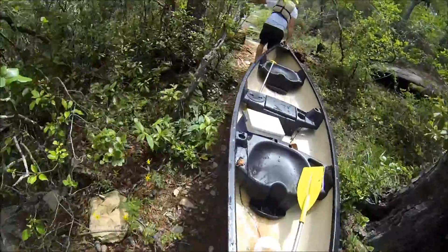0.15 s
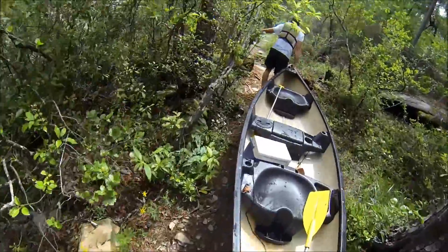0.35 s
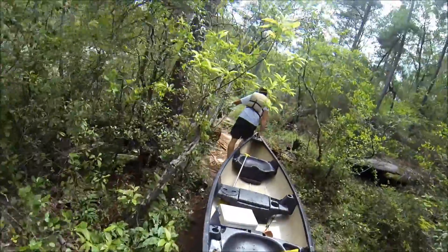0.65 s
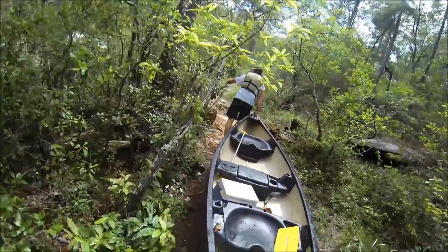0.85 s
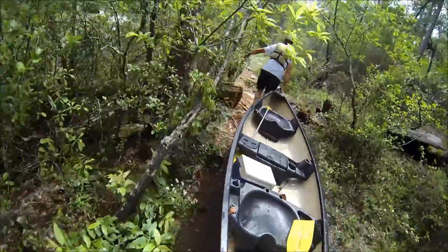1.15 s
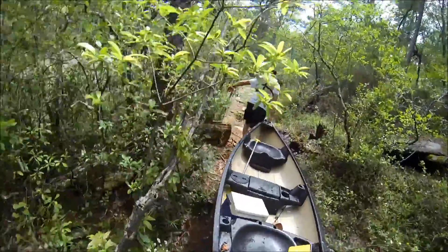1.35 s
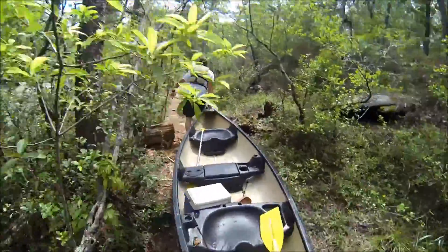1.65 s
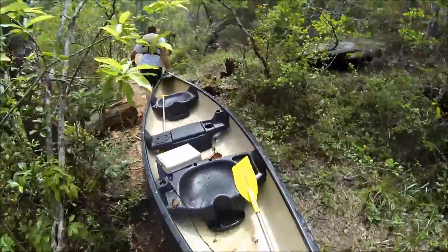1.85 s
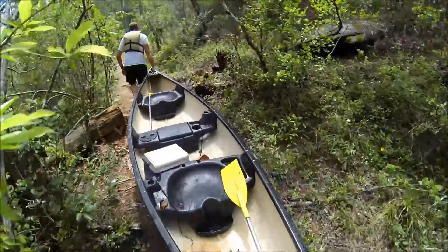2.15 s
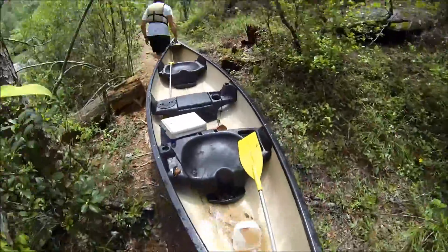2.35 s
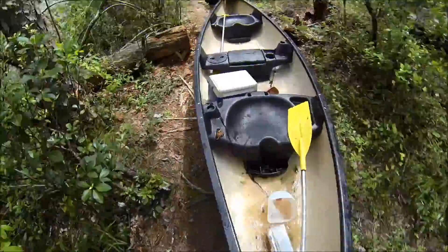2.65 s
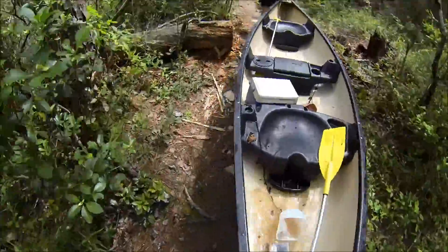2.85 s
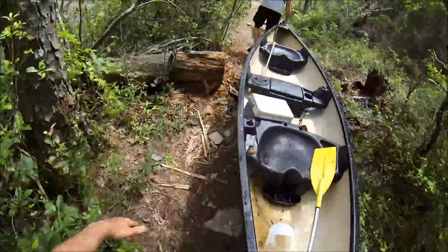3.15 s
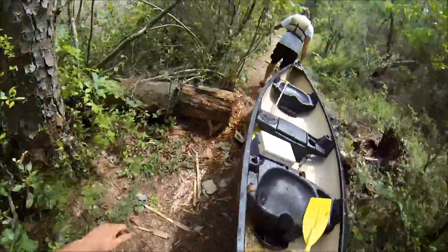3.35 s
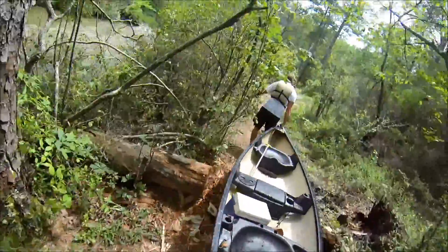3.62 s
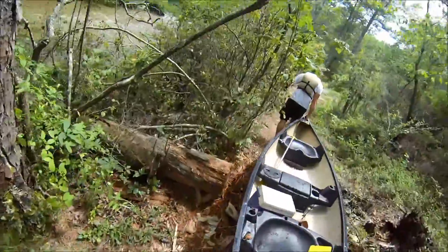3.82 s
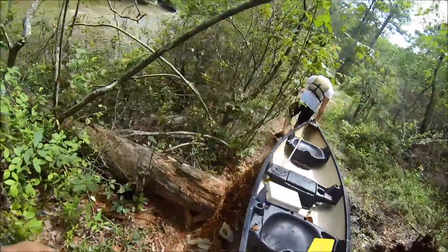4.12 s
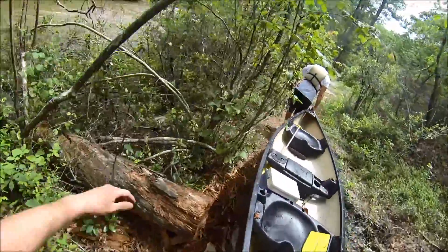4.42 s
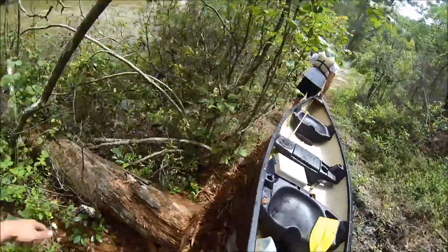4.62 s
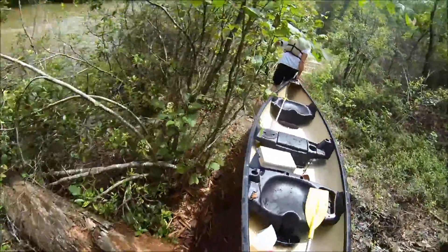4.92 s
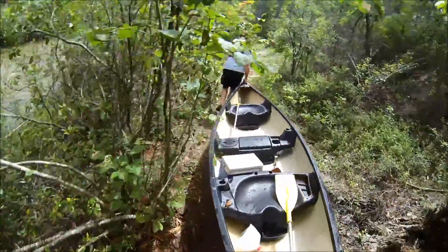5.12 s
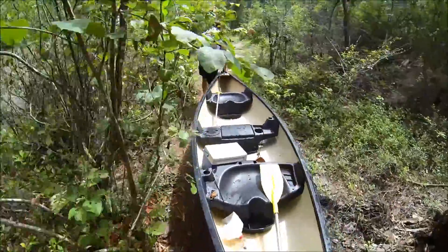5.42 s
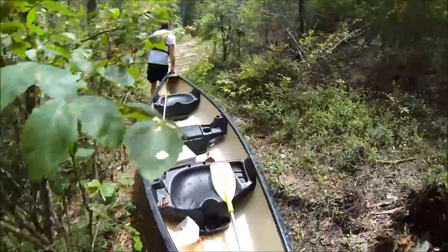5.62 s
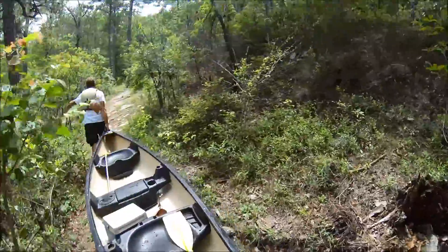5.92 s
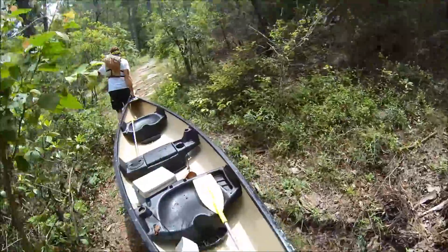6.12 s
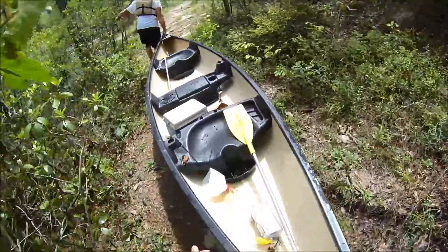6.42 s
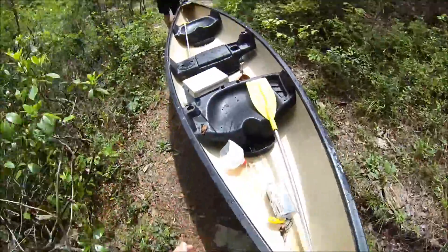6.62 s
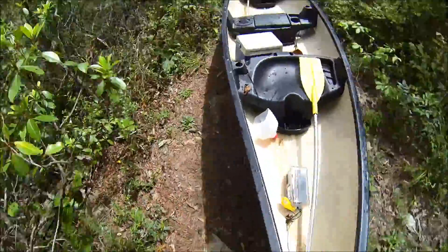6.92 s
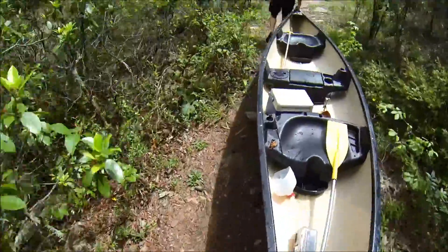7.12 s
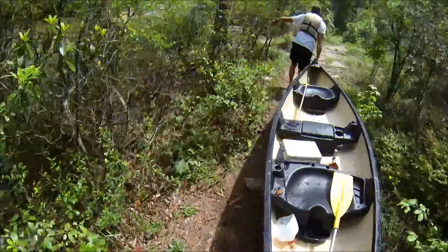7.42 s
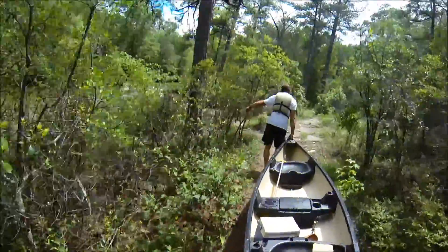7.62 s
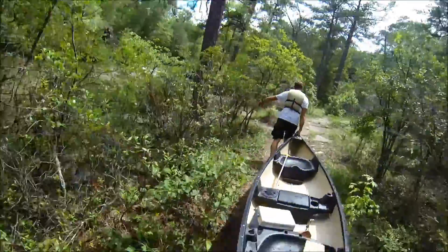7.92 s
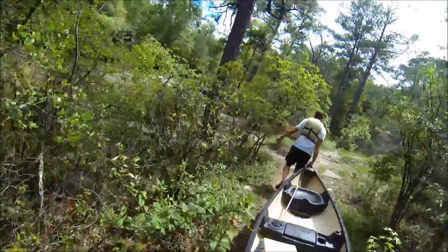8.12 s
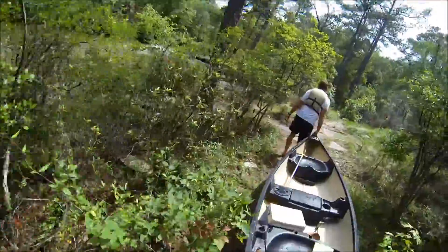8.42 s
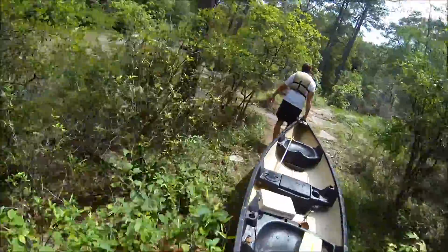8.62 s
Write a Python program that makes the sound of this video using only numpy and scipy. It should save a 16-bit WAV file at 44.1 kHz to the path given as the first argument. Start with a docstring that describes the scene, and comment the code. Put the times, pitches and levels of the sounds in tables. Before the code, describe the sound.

Outdoors on a wooded trail, a plastic canoe is dragged over dirt, heard close through a muffling case. Deep, almost subsonic jolts from steps and tugs come irregularly throughout, with continuous rocking rumble between them; notable ones fall near 0.45, 1.65, 2.15 and 5.6 seconds, and the heaviest near 6.1 and 8.2. A quiet, low, grainy hull drone continues underneath. Dull stone knocks occur near 0.1, 1.0, 2.3, 6.7 and 8.3, and soft case bumps near 0.8, 3.5, 4.4, 6.2 and 8.35. A sharp cluster of twig ticks snaps at 1.9, with single ticks near 2.8, 6.7, 7.8 and 8.0. Faint leafy crackles brush past around 1.9, 3.45, 5.1, 6.75, 7.5 and 8.1. Steady hollow hiss, slightly softer later, and a very faint high pulsing electronic whine persist to the end.

```python
"""On a woodland trail a plastic canoe is hauled along, heard from a body-worn camera in a closed case.
Steps and tugs shake the case into a deep rumble: brief swings that swell and fade over narrow-band noise.
The hull drones over dirt as filtered random grains, with soft bumps; stones and twigs ring as decaying modes.
Leaves brush past as bursts of crackle; they and the microphone's hiss take on the case's hollow resonances.
The camera's electronics whine faintly about thirty times a second, as a gated tone with some hiss."""
import sys
import numpy as np
from scipy import signal
from scipy.fft import rfft, irfft
from scipy.io import wavfile
from scipy.ndimage import uniform_filter1d

SR = 44100
rng = np.random.default_rng(int(sys.argv[2]) if len(sys.argv) > 2 else 0)


def transcribe(signal):
    """Save signal, clipped to [-1, 1], as a 16-bit WAV file at the path in sys.argv[1]."""
    frames = np.atleast_2d(signal).T
    limited = np.clip(frames, -1, 1)
    pcm = np.round(limited * 32767).astype(np.int16)
    wavfile.write(sys.argv[1], SR, pcm)


N = 386316

# Levels in the tables are relative wherever a source adds its own level.
# Steps and tugs that jolt the case: [t/s, level/dB, half length/s]
JOLTS = [(0.019, -16, 0.015), (0.452, -9.5, 0.018), (0.513, -14, 0.027), (0.681, -21, 0.0094),
         (1.087, -19.5, 0.08), (1.218, -13, 0.028), (1.651, -9.5, 0.03), (1.78, -24, 0.043),
         (2.155, -12, 0.012), (2.322, -20, .023), (2.839, -18.5, 0.026), (2.938, -19.5, 0.054),
         (3.197, -17.5, 0.011), (3.325, -20, 0.019), (3.919, -13, 0.022), (4.465, -15.5, 0.038),
         (4.632, -15.5, 0.017), (4.889, -23, 0.015), (4.963, -13, 0.012), (5.516, -15.5, .017),
         (5.589, -9.5, .016), (5.717, -19, 0.035), (6.077, -6.5, 0.019), (6.441, -18.5, 0.015),
         (6.658, -14.5, 0.026), (6.784, -15.5, 0.027), (7.252, -15.5, 0.045), (7.752, -12, 0.035),
         (7.871, -14.5, 0.021), (8.194, -5, .03), (8.289, -15, 0.035), (8.714, -13.5, 0.039)]
# The microphone's hiss, nearly steady: [t/s, level/dB]
HISS_LEVEL = [(0.0, -51.5), (0.48, -50.5), (0.87, -51.5), (1.35, -50.5), (2.08, -53), (2.59, -53.5),
              (3.58, -51), (4.72, -51), (5.23, -54), (5.45, -53), (6.52, -55.5), (7.07, -54.5), (7.51, -53),
              (8.7, -53.5)]
# Dull bumps on the case: [t/s, level/dB]
BUMPS = [(0.758, -35.5), (3.478, -34.5), (4.388, -26.5), (6.205, -31), (6.386, -36.5), (8.35, -26)]
# Stones knocking the hull: [t/s, level/dB]
KNOCKS = [(0.105, -46), (0.165, -42.5), (0.97, -46), (2.30, -47), (2.334, -43), (6.652, -38.5),
          (6.774, -45), (8.311, -46)]
# Twigs ticking, each with its favoured pitch: [t/s, level/dB, f/Hz]
TICKS = [(1.873, -41, 1100), (1.879, -39, 2000), (1.883, -31, 1500), (1.892, -31.5, 1450),
         (2.757, -38.5, 1950), (6.652, -45, 2100), (6.720, -43, 1850), (7.790, -43.5, 1500),
         (7.981, -36, 1550)]
# Leaves and stems brushing past: [t/s, level/dB, half length/s, centre f/Hz]
BRUSHES = [(1.886, -45.5, .008, 1450), (3.43, -50, .02, 1700), (3.49, -54, .025, 1900),
           (5.08, -54, .035, 1550), (6.745, -54, .024, 1750), (7.46, -53.5, .025, 1500),
           (8.135, -55, .022, 3300)]
# Resonances of the case: [f/Hz, width/Hz, level/dB]
CASE_MODES = [(1247, 136, -1.5), (1505, 137, 0), (2087, 250, -11.5), (3310, 114, -14.5), (4870, 300, -27.5),
              (8290, 170, -29)]
# Spectrum of the hiss between those resonances: [f/Hz, relative gain/dB]
HISS_SPECTRUM = [(700, -19), (1050, -12.5), (1400, -9.5), (1680, -4.5), (1850, -28), (2300, -14),
                 (2520, -20), (2900, -18.5), (3600, -18.5), (4100, -26.5), (5300, -24.5), (6000, -30),
                 (11000, -37.5), (15500, -55)]
# Spectrum of the hull's drone: [f/Hz, relative gain/dB]
DRONE_SPECTRUM = [(40, -26), (70, 7.5), (120, 4), (200, 4), (330, -2), (620, -3.5), (900, -10.5),
                  (1400, -17), (4000, -36)]
# Modes of the hull: [f/Hz, level/dB, time to fall 60 dB/s]
HULL_MODES = [(207, -3.5, 0.17), (308, 2.5, 0.032), (523, -7, 0.024), (684, -2, 0.026)]
# Modes of the twigs: [f/Hz, level/dB, time to fall 60 dB/s]
TWIG_MODES = [(1020, -8, .02), (1530, -1, .025), (1930, -3, .025), (2120, -8, .02), (2800, -9, .012),
              (3400, -12, .012), (5350, -9, .008)]
# Whine of the electronics: [t/s, level/dB]
WHINE = [(0.0, -78), (0.09, -79), (4.92, -79), (6.62, -76), (6.83, -81), (8.7, -78.5)]

TIME = np.arange(N) / SR
BINS = np.maximum(np.arange(N // 2 + 1) * SR / N, 1)  # f/Hz of each spectral bin, kept above zero
SWING_HZ, STIFFEN_HZ_PER_DB = 26.45, 0.36  # swing at the mean jolt level; harder jolts swing faster
REST_DB, STIR_DB = -32.5, -12  # rocking between the jolts; stirred rocking relative to the effort
BUILD_S, SETTLE_S = 0.062, 0.097  # time constants before and after a jolt
DRONE_DB, PRESS_EXPONENT = -56.5, 0.075  # drone at mean effort; power of the effort that it follows
WHINE_HZ, FRAME_HZ = 11299, 30000 / 1001
CUTOFF_HZ = 15700


def effort():
    """Energy summation: the walker's effort builds and settles exponentially around each jolt."""
    energy = np.zeros(N)
    for s, db, _ in JOLTS:
        exponent = np.minimum((TIME - s) / BUILD_S, (s - TIME) / SETTLE_S)
        energy += (from_db(db) * np.exp(exponent)) ** 2
    return np.sqrt(energy)


def rumble(work, sway_hz, width_hz, unevenness, jolt_db, top_hz):
    """Resonance on a mount: random sway rocks the case; at each step or tug a brief swing swells and fades."""
    sway = signal.hilbert(coloured(rng.standard_normal(N), hump(sway_hz, width_hz)))
    # Dividing by the envelope compresses the sway's strongest swings.
    evened = sway.real / np.sqrt(np.abs(sway) ** 2 + unevenness)
    rocking = coloured(evened, 1 / np.sqrt(1 + (BINS / top_hz) ** 8))

    mean_db = np.mean(JOLTS, axis=0)[1]
    jolts = np.zeros(N)
    for s, db, half_length in JOLTS:
        swing_hz = SWING_HZ + STIFFEN_HZ_PER_DB * (db - mean_db)
        jolts += from_db(db) * swell(s, half_length) * np.sin(2 * np.pi * swing_hz * (TIME - s))

    rocking_level = np.hypot(from_db(REST_DB), from_db(STIR_DB) * work)
    return rocking_level * rocking + from_db(jolt_db) * jolts


def judder(swing, level_db, judder_hz):
    """Amplitude modulation: the wider the case swings, the more it judders in its mount."""
    envelope = np.abs(signal.hilbert(swing))
    noise = coloured(rng.standard_normal(N), hump(judder_hz, width=28.0))
    return from_db(level_db) * envelope * noise


def hull_drone(work):
    """Friction as random impulses: the dragged hull drones unevenly, a little louder with effort."""
    uneven_grains = grains(per_s=3500, spread_db=1.3) * from_db(1.6 * drift(hz=7.9))
    drone = coloured(uneven_grains, shape(DRONE_SPECTRUM))
    pressing = (work / work.mean()) ** PRESS_EXPONENT
    return from_db(DRONE_DB) * pressing * drone


def knocks(level_db):
    """Impulse excitation: stones strike all the hull's modes alike."""
    s, db = np.transpose(KNOCKS)
    return struck(s, db + level_db, HULL_MODES, lambda hz: 0)


def bumps(level_db, push_s, thud_hz):
    """Soft contact: a smooth pulse gives the case one short push and pull."""
    out = np.zeros(N)
    for s, db in BUMPS:
        out += from_db(db + level_db) * swell(s, push_s) * np.sin(2 * np.pi * thud_hz * (TIME - s))
    return out


def ticks(octave_db):
    """Selective modal excitation: each twig favours the modes near a pitch of its own."""
    s, db, own_hz = np.transpose(TICKS)
    return struck(s, db, TWIG_MODES, lambda hz: -octave_db * np.abs(np.log2(hz / own_hz)))


def brushes(width_hz):
    """Granular contact: foliage crackles past in short bursts, coloured by the case."""
    crackle = coloured(grains(per_s=2500, spread_db=1.6), case_colour() ** .75)
    out = np.zeros(N)
    for s, db, half_length, hz in BRUSHES:
        band = coloured(crackle, hump(hz, width_hz) ** .7)
        out += from_db(db) * swell(s, half_length) * band
    return out


def whine(level_db, duty, hiss_db):
    """Periodic gating: an unsteady thin tone with hiss swells in part of each camera frame and stops short."""
    phase = (TIME * FRAME_HZ - .37) % 1
    rise = np.clip((phase - 1 + duty) / duty, 0, 1) ** 0.25
    gate = uniform_filter1d(rise, size=110)  # softens the edges
    tone = np.sqrt(2) * np.sin(2 * np.pi * WHINE_HZ * TIME + 1.1 * drift(hz=40))
    hiss = from_db(hiss_db) * coloured(rng.standard_normal(N), hump(11080, 700))
    return from_db(level_db) * gains(WHINE)[0] * rms_one(gate * (tone + hiss))


def microphone_hiss(hiss_db):
    """Filtered noise: dense random grains give the microphone's steady hiss, coloured by the closed case."""
    hiss = coloured(grains(per_s=22000, spread_db=2.0), case_colour())
    return from_db(hiss_db) * gains(HISS_LEVEL)[0] * hiss


def struck(s, db, modes, reach):
    """Modal superposition: blows ring decaying sines; reach(hz) is the dB each blow adds to a mode."""
    out = np.zeros(N)
    for k, (hz, mode_db, t60) in enumerate(modes):
        clicks = np.zeros(N)
        chance_db = rng.standard_normal(len(s))
        clicks[(s * SR).astype(int)] = from_db(db + mode_db + reach(hz) + chance_db)
        radius = np.exp(-np.log(1000) / (t60 * SR))
        angle = 2 * np.pi * hz / SR
        poles = [1, -2 * radius * np.cos(angle), radius * radius]
        ring = signal.lfilter([0, np.sin(angle)], poles, clicks + 1e-18)
        out += (-1) ** k * ring  # neighbouring modes start in opposite directions
    return out


def case_colour():
    """Power summation: the hiss spectrum and the case's resonances form one gain per frequency."""
    resonances = sum((from_db(db) * hump(hz, width)) ** 2 for hz, width, db in CASE_MODES)
    return np.sqrt(shape(HISS_SPECTRUM) ** 2 + resonances)


def grains(per_s, spread_db):
    """Random point process: tiny impulses of uneven size at chance moments, at unit rms."""
    sizes = from_db(spread_db * np.minimum(rng.exponential(1, N), 4))
    happens = rng.random(N) < per_s / SR
    return rms_one(happens * sizes * rng.standard_normal(N))


def drift(hz):
    """Low-pass noise: a slow random wander at unit rms."""
    return coloured(rng.standard_normal(N), 1 / (1 + (BINS / hz) ** 2))


def swell(s, half_length):
    """Gaussian envelope: a smooth rise and fall around a moment."""
    return np.exp(-.5 * ((TIME - s) / half_length) ** 2)


def hump(hz, width):
    """Resonance curve: the gain peaks at one frequency and falls steeply to either side."""
    return 1 / (1 + ((BINS ** 2 - hz ** 2) / (BINS * width * np.pi / 2)) ** 2)


def shape(points):
    """Spectral envelope: dB points interpolated over log frequency give a gain per bin."""
    hz, db = np.transpose(points)
    return from_db(np.interp(np.log(BINS), np.log(hz), db))


def coloured(x, gain):
    """Linear filtering: multiply the spectrum by a gain, then scale to unit rms."""
    return rms_one(irfft(rfft(x) * gain, N))


def gains(rows):
    """Level envelope: each dB column interpolated over time gives a gain per sample."""
    s, *columns = np.transpose(rows)
    return [from_db(np.interp(TIME, s, column)) for column in columns]


def rms_one(x):
    """Power normalisation: scale to unit rms."""
    return x / np.sqrt(np.mean(x ** 2) + 1e-20)


def from_db(db):
    """Logarithmic level: convert decibels to amplitude gain."""
    return 10 ** (np.asarray(db) / 20)


def scene():
    """Superposition: all sources add at one microphone."""
    work = effort()
    swing = rumble(work, sway_hz=24.84, width_hz=12.5, unevenness=1.0, jolt_db=1.5, top_hz=54.4)
    shaking = swing + judder(swing, level_db=-32.5, judder_hz=57)
    dragging = hull_drone(work)
    hits = knocks(level_db=-2.5) + bumps(level_db=3.5, push_s=0.0024, thud_hz=92.6)
    twigs = ticks(octave_db=11)
    leaves = brushes(width_hz=850)
    electronics = whine(level_db=4, duty=0.52, hiss_db=-4.5)
    hiss = microphone_hiss(hiss_db=0.5)
    return (shaking + dragging + hits + twigs + leaves + electronics + hiss)[None]


def record(dry):
    """Band limiting: a steep elliptic low-pass filter cuts the top."""
    lowpass = signal.ellip(10, .1, 80, CUTOFF_HZ, fs=SR, output="sos")
    return signal.sosfilt(lowpass, dry)


dry = scene()
out = record(dry)
transcribe(out)
```